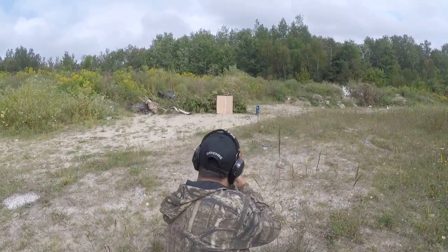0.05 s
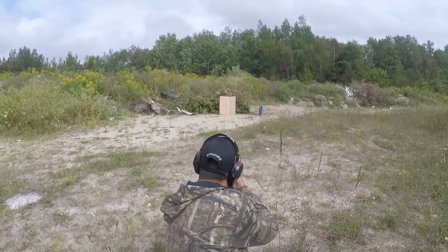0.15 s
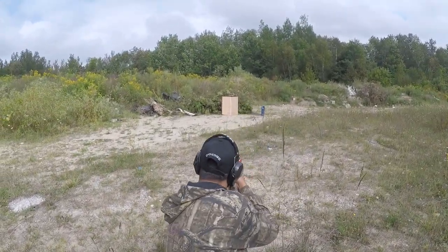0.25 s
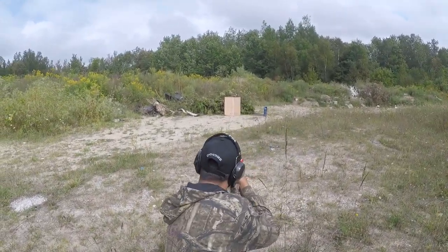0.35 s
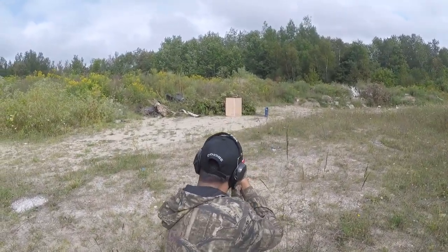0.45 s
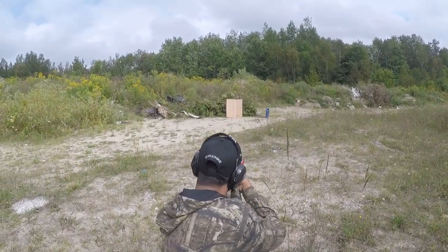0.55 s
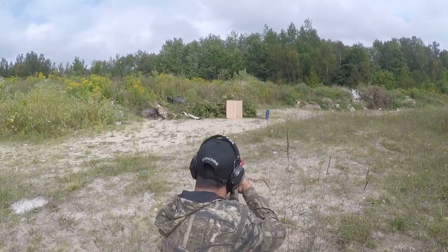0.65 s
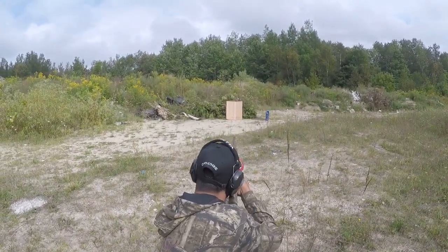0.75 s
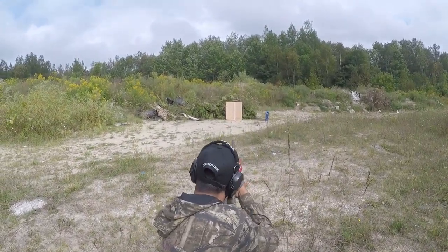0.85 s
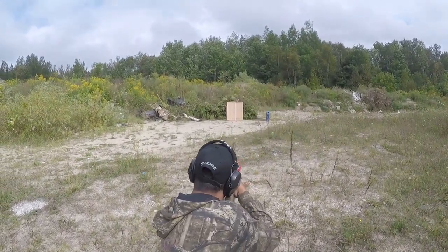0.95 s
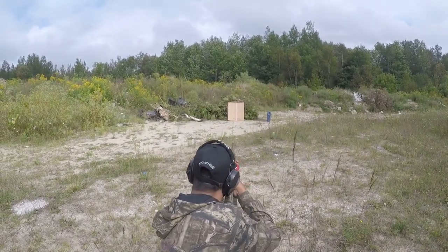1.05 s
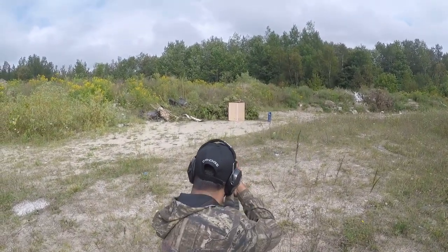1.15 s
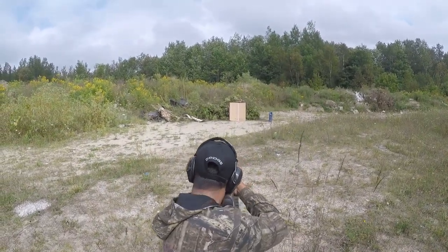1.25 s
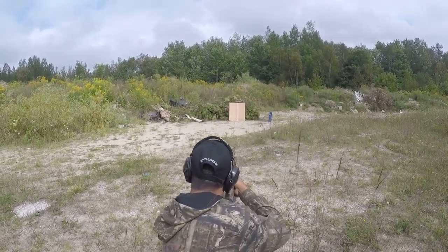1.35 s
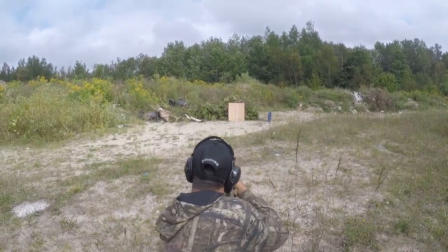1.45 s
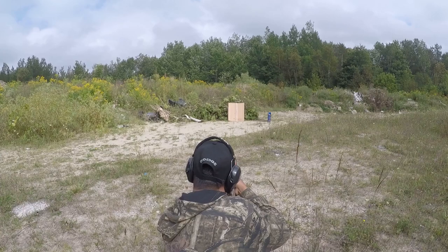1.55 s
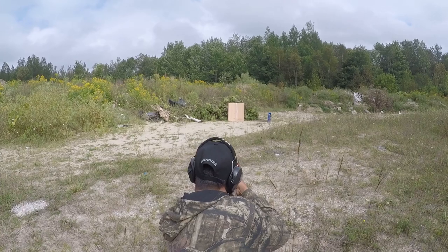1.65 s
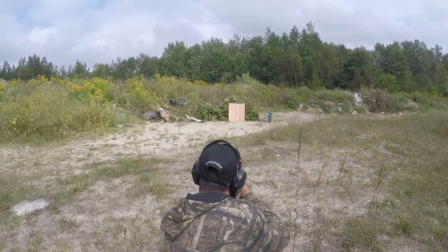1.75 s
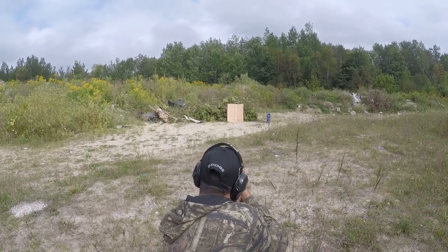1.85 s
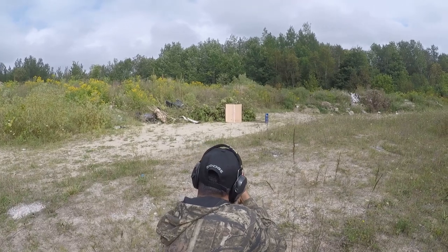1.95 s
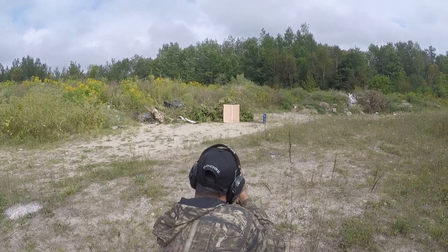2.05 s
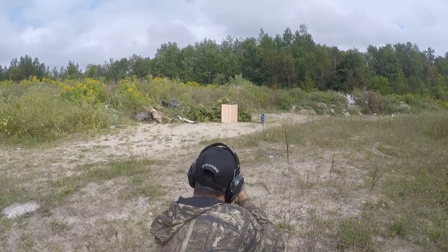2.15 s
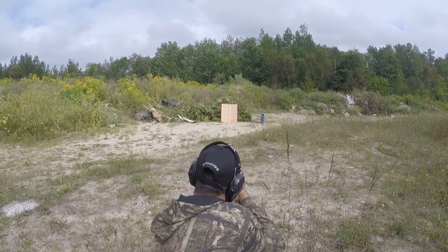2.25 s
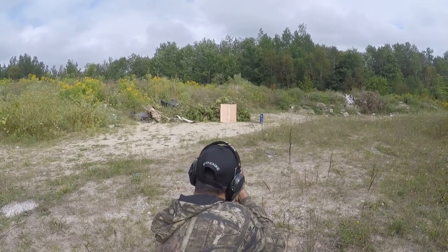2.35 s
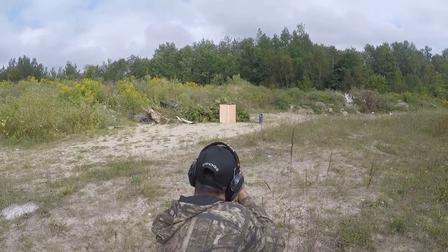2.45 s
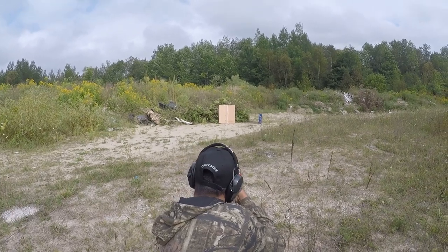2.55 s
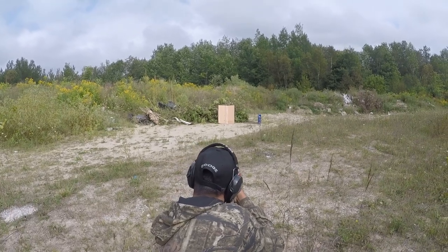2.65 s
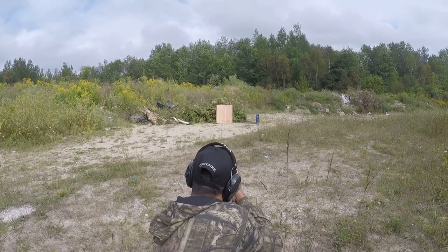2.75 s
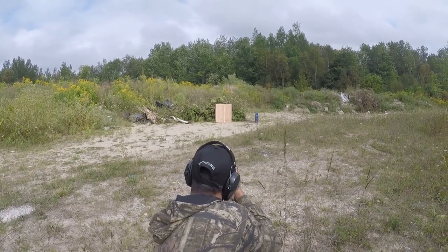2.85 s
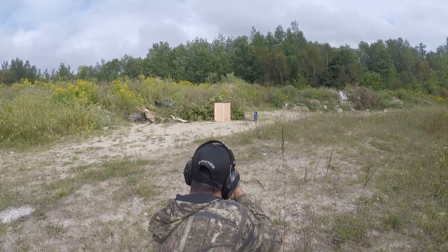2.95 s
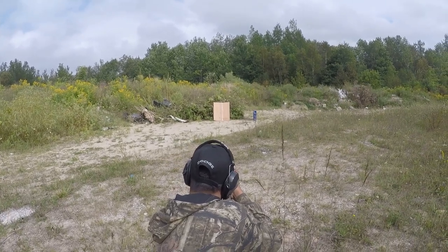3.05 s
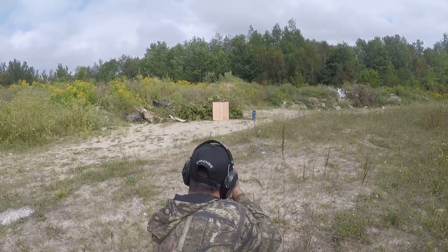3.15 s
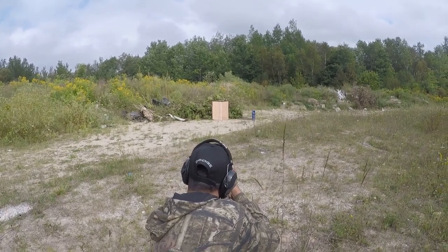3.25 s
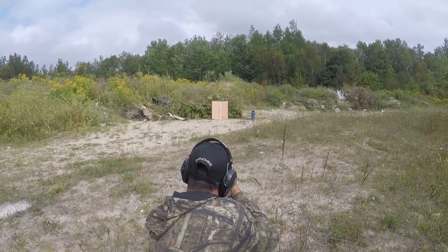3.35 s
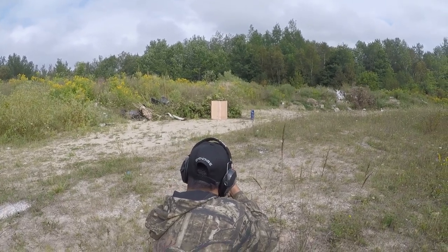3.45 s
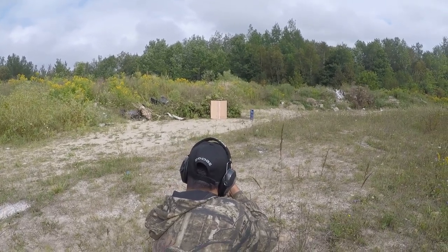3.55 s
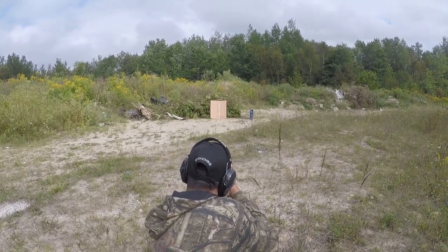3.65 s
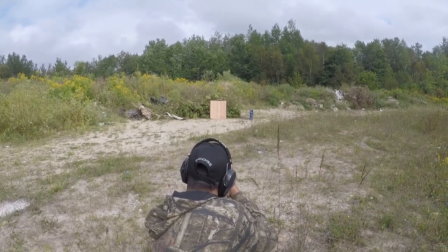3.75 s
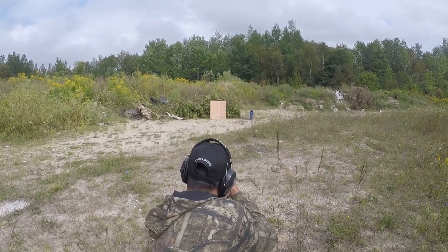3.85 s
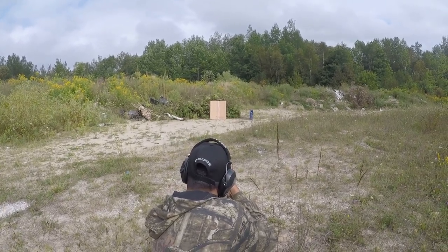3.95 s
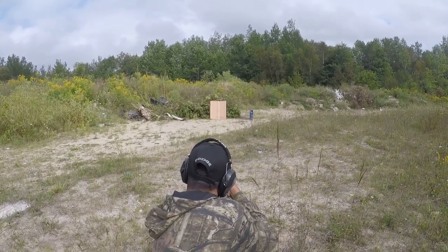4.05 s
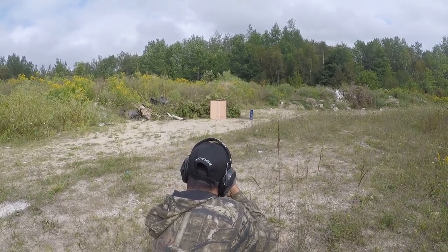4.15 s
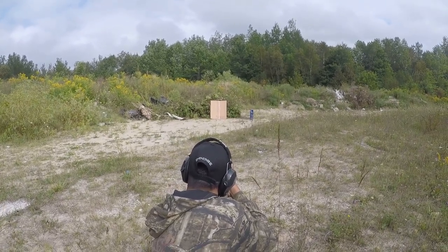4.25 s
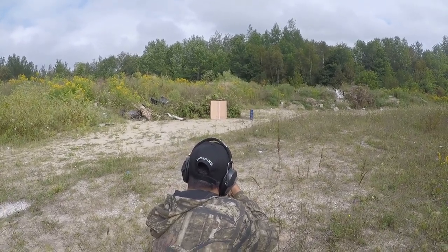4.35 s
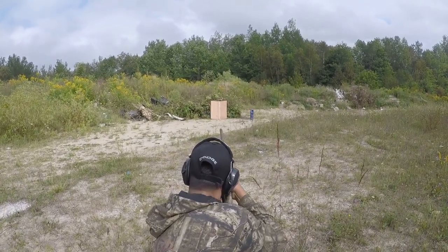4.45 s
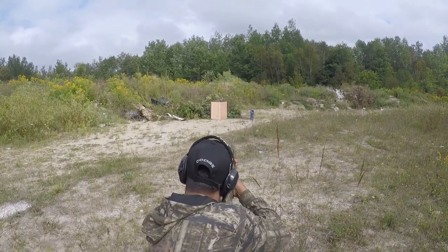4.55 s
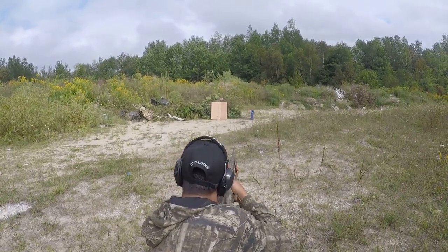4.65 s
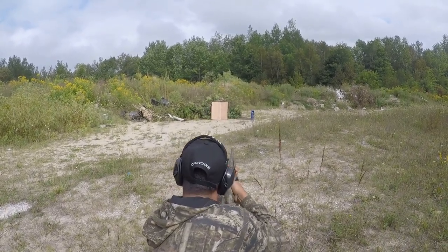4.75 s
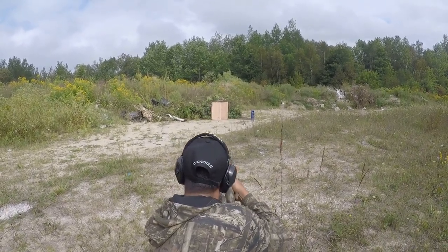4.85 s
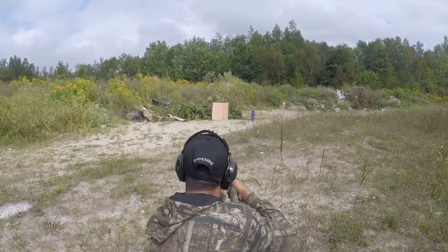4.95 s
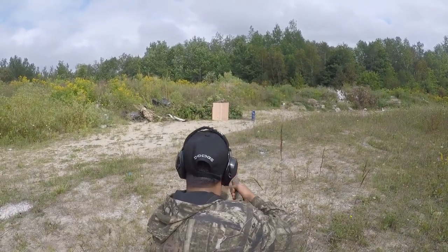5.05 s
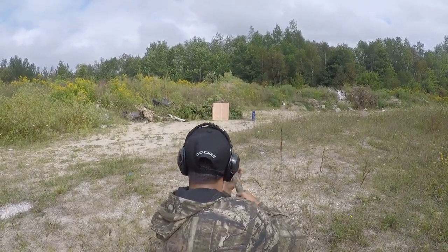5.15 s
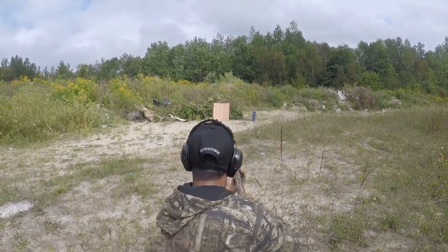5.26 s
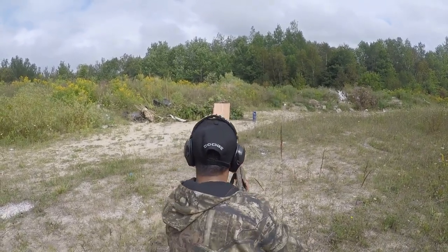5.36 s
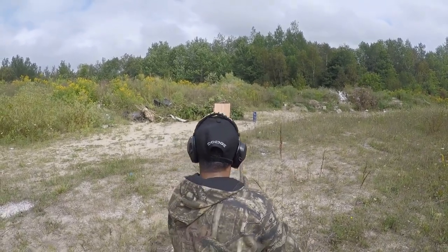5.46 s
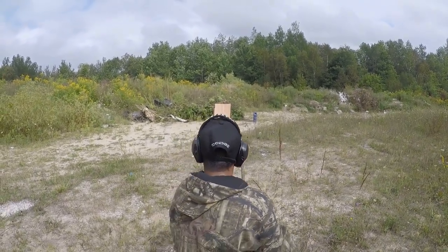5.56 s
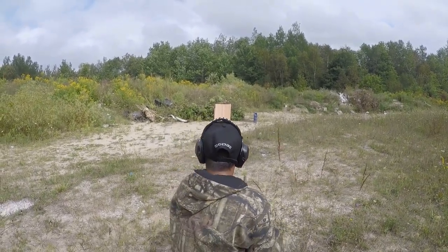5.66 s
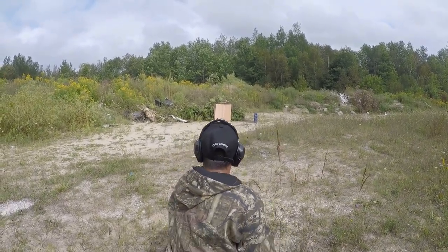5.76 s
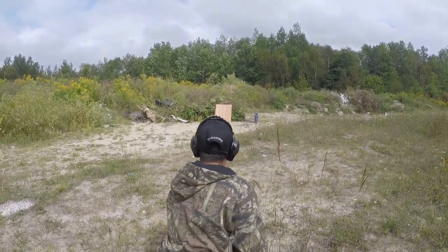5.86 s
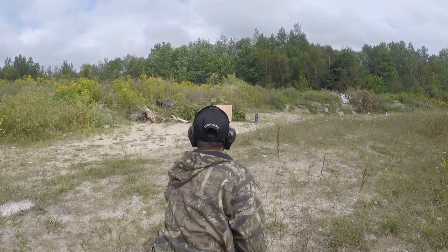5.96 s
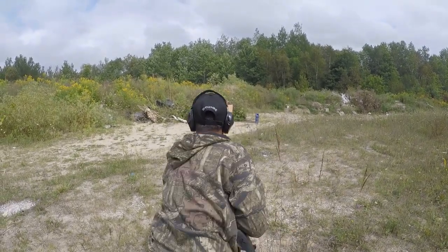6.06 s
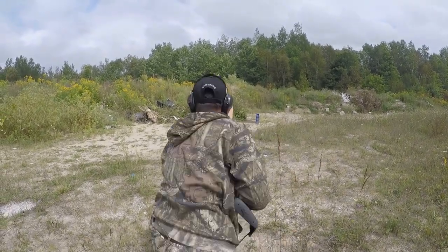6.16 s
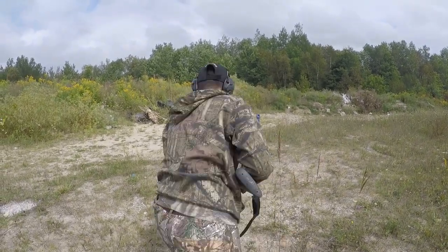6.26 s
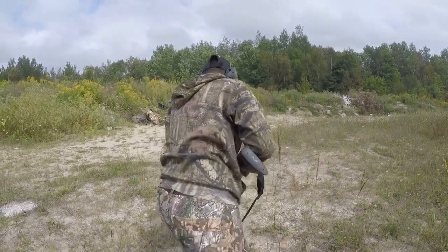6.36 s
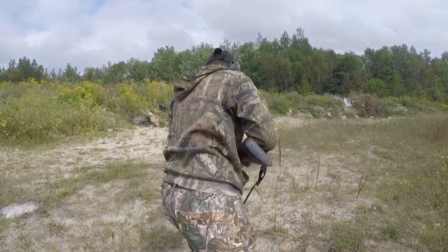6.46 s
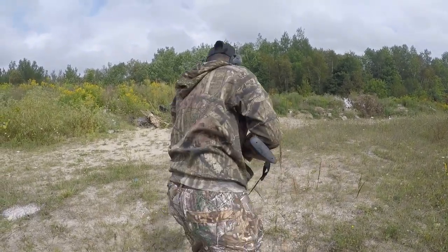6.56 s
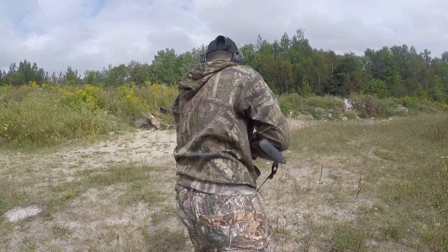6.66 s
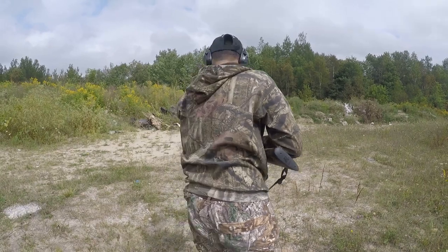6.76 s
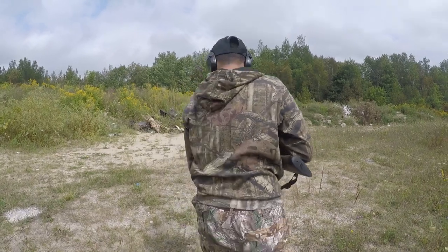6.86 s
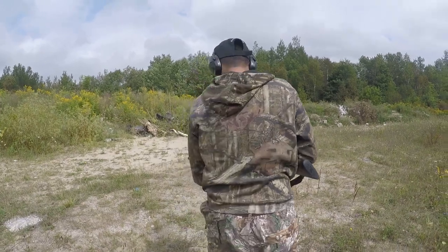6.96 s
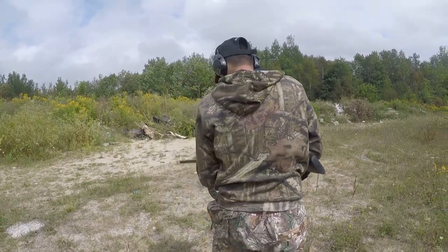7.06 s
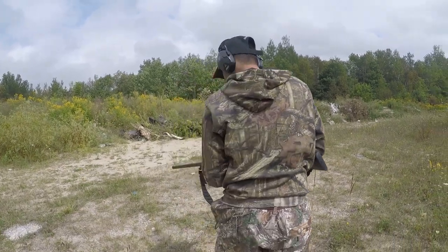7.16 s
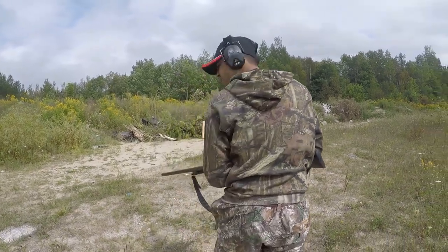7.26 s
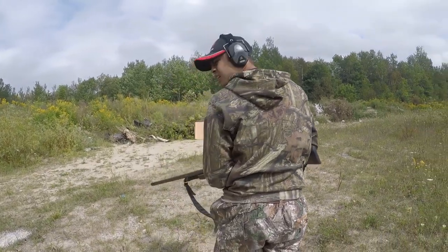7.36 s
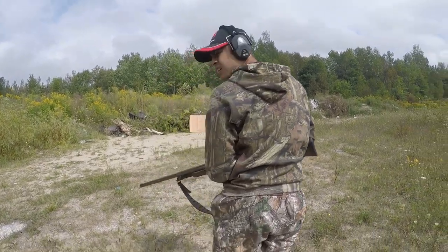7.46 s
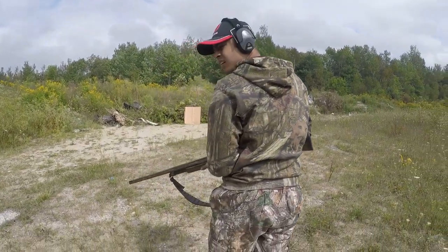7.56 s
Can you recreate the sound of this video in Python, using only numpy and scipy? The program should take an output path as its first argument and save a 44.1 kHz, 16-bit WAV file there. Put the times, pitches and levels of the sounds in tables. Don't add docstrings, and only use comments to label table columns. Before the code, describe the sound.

Outdoors, insects trill under small camera bumps until a single shotgun shot cracks, rolls back off the trees, and steel parts crunch shortly after.

```python
import sys
import numpy as np
from scipy import signal
from scipy.fft import rfft, irfft
from scipy.io import wavfile

SR = 44100
rng = np.random.default_rng(int(sys.argv[2]) if len(sys.argv) > 2 else 0)


def dump_mix(stems):
    frames = np.atleast_2d(stems).T
    limited = np.clip(frames, -1, 1)
    pcm = np.round(limited * 32767).astype(np.int16)
    wavfile.write(sys.argv[1], SR, pcm)


def undo_db(level):
    steps = np.asarray(level, float) / 20
    return 10 ** steps


N = 335160
T = np.arange(N) / SR
SHORT = 6000


def rms_one(x):
    return x / np.sqrt(np.mean(x ** 2) + 1e-20)


def in_time(rows):
    s, *columns = np.transpose(rows)
    return [np.interp(T, s, c, left=-120, right=-120) for c in columns]


def at_hz(points, hz):
    point_hz, value = np.transpose(points)
    return np.interp(np.log(hz), np.log(point_hz), value)


def drift(rate):
    r = np.exp(-80 * np.pi * rate / SR)
    chance = rng.standard_normal(N // 40 + 2002)
    slow = signal.lfilter([1], [1, -2 * r, r * r], chance)[2000:]
    return np.interp(np.arange(N) / 40, np.arange(len(slow)), rms_one(slow))


def band(x, low_hz, high_hz, order=2):
    return signal.sosfilt(signal.butter(order, [low_hz, high_hz], "band", fs=SR, output="sos"), x)


def ring(clicks, hz, t60):
    r = undo_db(-60 / (t60 * SR))
    w = 2 * np.pi * hz / SR
    return signal.lfilter([0, np.sin(w)], [1, -2 * r * np.cos(w), r * r], clicks + 1e-18)


def soft(clicks, contact_s):
    pulse = np.hanning(max(3, round(contact_s * SR)))
    return np.convolve(clicks, pulse / pulse.sum())[:len(clicks)]


def swell(rise_s, t60):
    t = T[:SHORT]
    rise = np.sin(np.pi / 2 * np.minimum(t / rise_s, 1)) ** 2
    return rise * undo_db(-60 * np.maximum(t - rise_s, 0) / t60)


def add(out, s, sound):
    i = round(s * SR)
    out[..., i:i + sound.shape[-1]] += sound[..., :N - i]


def sides(db):
    return undo_db(np.array([[db / 2], [-db / 2]]))


def coloured(spectrum, alike, patchy_db):
    hz = np.fft.rfftfreq(N, 1 / SR) + 1
    mid, side = rfft(rng.standard_normal((2, N))) * undo_db(at_hz(spectrum, hz))
    c = np.clip(at_hz(alike, hz), -1, 1)
    both = irfft(np.sqrt(1 + c) * mid + np.sqrt(1 - c) * side * [[1], [-1]], N)
    return rms_one(both * undo_db(patchy_db * drift(11.4)))


# t/s, push level/dB, ring f/Hz, crack level/dB,
# crack t60/s
BLAST = [(4.3909, -21, 875, -11.5, 0.0072), (4.396, -34, 900, -24, 0.0088), (4.4013, -22, 770, -40, .01),
         (4.4026, -18, 600, -26, 0.04), (4.4106, -14.5, 880, -30, .01), (4.4125, -5.5, 770, -10.5, 0.012),
         (4.4159, -4, 770, -22, 0.024), (4.4195, -31, 880, -16, 0.022), (4.4226, -3.5, 770, -10.5, 0.013),
         (4.4239, -8.5, 685, -18, 0.017), (4.4278, -9.5, 600, -28, .015), (4.4296, -6.5, 880, -1, 0.0099),
         (4.4326, -12, 880, -18, 0.012), (4.4336, -4.5, 860, 3.5, 0.0062), (4.4342, -15, 880, 1, 0.011),
         (4.4361, -4, 270, -21.5, 0.011), (4.491, -52, 890, -23.5, 0.042), (4.509, -50, 900, -26, 0.015),
         (4.518, -53, 900, -32.5, 0.038), (4.573, -36, 1050, -34, 0.18), (4.8252, -23, 1050, -25, 0.025)]
# t/s, level/dB
SWING = [(4.398, -34), (4.408, -16.5), (4.417, -7.5), (4.43, -10.5), (4.438, -15.5), (4.446, -37),
         (4.456, -46)]
# from t/s, to t/s, f/Hz, level/dB
WHISTLE = (4.403, 4.431, 7920, -35)
# f/Hz, level/dB
CRACK = [(250, -8), (710, -2.5), (1200, -5), (1750, -6.5), (2940, -7), (4830, -10.5), (5710, -6),
         (10600, -30), (12300, -32), (14900, -44.5)]


def blast():
    out, click = np.zeros((2, N)), np.eye(1, SHORT)[0]
    crack = coloured(CRACK, [(1000, .8), (9000, 0.55)], patchy_db=0)
    for s, push_db, hz, crack_db, t60 in BLAST:
        push_t60 = min(.0085, 7.7 / hz + .004)
        push = -undo_db(push_db + 0.5) * ring(soft(click, 0.00013), hz, push_t60)
        twist = 0.25 * np.roll(push, 25) * [[1], [-1]]
        burst = crack[:, round(s * SR):][:, :SHORT] * undo_db(crack_db - 8.0) * swell(0.00063, t60)
        add(out, s, push + twist + burst)
    phase = 2 * np.pi * 143 * (T - 4.406)
    swing = undo_db(in_time(SWING)[0]) * np.sin([phase + 0.23, phase - .6])
    start, end, hz, db = WHISTLE
    arch = np.sqrt(np.maximum(0, 4 * (T - start) * (end - T))) / (end - start)
    whistle = undo_db(db) * arch * np.sin(2 * np.pi * hz * T)
    return out + swing * sides(3.1) + whistle * [[.4], [1.6]]


# t/s, level/dB, rise/s, fall/(dB/s), treble level/dB
ECHO = [
    (4.44, -47.5, .004, 380, -11),
    (4.47, -68, 0.033, 0, 7.5),
    (4.6, -64.5, 0.033, 145, 5.5),
    (4.75, -45.5, 0.023, 85.5, 1),
    (4.868, -44, 0.074, 82, -3.5),
    (4.97, -54, 0.2, 21, -3),
    (5.3, -59.5, 0.61, 2, -28),
]


def returns(faster, air_db_per_s, bright):
    power = 0
    for s, db, rise_s, fall, treble_db in ECHO:
        climb_db = 18.5 * np.minimum(T - s, 0) / rise_s
        fall_db = (faster * fall + air_db_per_s) * np.maximum(T - s, 0)
        power = power + undo_db(db + bright * treble_db - fall_db + climb_db) ** 2
    return np.sqrt(power) * (T > ECHO[0][0])


# f/Hz, level/dB
ECHO_BODY = [(130, -12), (200, -2), (404, -3), (496, -3.5), (686, -3.5), (834, 2), (1430, -6),
             (2600, -21.5), (3380, -29.5), (5720, -120)]
# f/Hz, level/dB
ECHO_TOP = [(1060, -17), (1800, -2), (2350, -9), (2660, -6), (4900, -12), (6070, -7), (9810, -31),
            (11300, -43), (13000, -49)]
# f/Hz, likeness/(-1 to 1)
ECHO_ALIKE = [(60, 0.35), (180, 1), (540, 0.75), (1610, 0.18), (4830, 0.87), (14500, -1.4)]


def echo():
    body = undo_db(6.0) * returns(1, 0, 0) * coloured(ECHO_BODY, ECHO_ALIKE, patchy_db=.4)
    treble = coloured(ECHO_TOP, ECHO_ALIKE, patchy_db=.4)
    dull = signal.sosfilt(signal.butter(2, 6800, fs=SR, output="sos"), treble)
    dark = signal.sosfilt(signal.butter(2, 2800, fs=SR, output="sos"), treble)
    top = (treble - dull) * undo_db(-45 * np.maximum(T - 4.8, 0) + 6)
    middle = (dull - dark) * undo_db(-22.0 * np.maximum(T - 5.1, 0))
    treble_level = undo_db(7.0) * returns(faster=1, air_db_per_s=3.5, bright=0.7)
    return body + treble_level * (dark + middle + top)


# t/s, peak level/dB, tilt/(dB per octave)
CLICKS = [
    (6.914, -36, 1),
    (6.934, -29, 1),
    (6.94, -39, 3),
    (6.947, -22, 3.5),
    (6.957, -24, 5),
    (6.9619, -22.5, -14),
    (6.9662, -10.5, -8),
    (6.967, -46, 6),
    (6.973, -50, -2),
]
# f/Hz, level/dB, t60/s
ACTION = [(1250, -6.5, 0.013), (1840, -2.5, 0.0052), (2540, -20, 0.005), (3200, 7.5, 0.0051),
          (3940, -5.5, 0.011), (4700, 1, 0.011), (5350, -5, 0.008), (6130, 0, 0.003), (7600, -16, 0.028),
          (9400, -9.5, 0.0072), (12400, -14, 0.0061)]
# t/s, level/dB
SLIDE = [(6.9125, -45), (6.915, -39), (6.93, -33.5), (6.945, -32), (6.955, -37), (6.966, -30), (6.985, -59),
         (7.0, -56)]
# f/Hz, level/dB
CRUNCH = [(290, -47), (500, -4), (1230, 0), (2200, -11), (4630, -5), (5110, -20.5), (6500, -8.5),
          (8250, -30.5), (9640, -26), (14500, -44)]


def action():
    s, db, tilt_db = np.transpose(CLICKS)
    slide = undo_db(in_time(SLIDE)[0])
    grain = undo_db(-18.5 + 7.6 * np.minimum(rng.exponential(1, N), 2.5))
    scrape = slide * grain * (rng.random(N) < 3000 / SR)
    out = np.zeros(N)
    for hz, mode_db, t60 in ACTION:
        clicks = scrape * rng.choice([-1, 1], N) * min(1, hz / 3000)
        struck = s + rng.uniform(0, .0018, len(s)) * (hz > 1500)
        blow_db = db - 4 + tilt_db * np.log2(hz / 3000) + rng.normal(0, 3.0, len(s))
        clicks[(struck * SR).astype(int)] -= undo_db(blow_db)
        out += ring(undo_db(mode_db) * clicks, hz, t60)
    envelope = np.array([.5 * slide, .5 * slide])
    for at, level_db, tilt in zip(s, db, tilt_db):
        low_cut_db = np.array([[1.2 + 2.4 * max(tilt, 0)], [0]])
        add(envelope, at, undo_db(level_db + 2 - low_cut_db) * swell(0.00049, 0.031))
    grit = coloured(CRUNCH, [(1000, 0.67), (9000, .7)], patchy_db=0)
    crunch = envelope[0] * band(grit, 200, 1430) + envelope[1] * band(grit, 2080, 14000)
    return (soft(out, 0.00013) + crunch) * sides(-2.5)


# (f/Hz, level/dB, t60/s)
CATCH = [
    (0.9257, -22.5, -4, [(1080, -7, 0.021), (1790, -7, 0.019), (2180, -5, .013), (3020, 0.5, .019), (3380, -1.5, .015), (4320, -3.5, 0.032), (5480, -4.5, 0.013), (6800, -10, .02)]),
    (0.987, -35.5, -4, [(1890, -1.5, 0.036), (4436, -1, .06)]),
    (1.0011, -31, -2, [(900, -5, 0.011), (1840, -12, 0.026), (2900, -8, 0.011), (4700, -8, .015), (6000, 3, 0.012), (7320, -6, .015)]),
]


def catch():
    out, click = np.zeros((2, N)), np.eye(1, SHORT, 40)[0]
    touch = 0.18 * click + np.roll(click, 55) + 0.46 * np.roll(click, 150)
    for s, db, rattle_db, modes in CATCH:
        rings = np.zeros(SHORT)
        for k, (hz, mode_db, t60) in enumerate(modes):
            rings += (-1) ** k * undo_db(mode_db) * ring(touch, hz, t60)
        noise = rng.standard_normal((2, SHORT))
        rattle = undo_db(rattle_db) * band(noise[0] + 0.87 * noise, 880, 5000) * swell(0.0026, 0.044)
        add(out, s - .002, undo_db(db) * (0.91 * rings + rattle) * sides(-4.5))
    return out


# t/s, peak level/dB, ring f/Hz, snap level/dB, L-R level/dB
TAPS = [(0.133, -31.5, 877, -2.5, -3), (0.521, -35, 860, -7, -2), (0.908, -39, 804, -8, -1),
        (1.34, -40, 870, -1, 0), (1.4395, -28, 874, -9.5, -2)]
GRIPS = [(0.712, -36.5, 334, -2, 2.5), (0.729, -35, 170, -22, 1), (1.243, -35.5, 159, -31, 6),
         (1.697, -31, 184, -34, 5), (1.903, -35, 292, -1, 1.5), (2.051, -38, 138, -9, -12),
         (2.196, -23, 188, -16, 0), (2.584, -28.5, 307, -3, 3.5), (2.593, -28, 275, 1, -4.5),
         (2.734, -34, 324, -4, 4), (2.92, -30, 313, 2, 3), (2.963, -35, 262, -13, -5),
         (3.001, -31, 300, 0, -1), (3.015, -25.5, 290, -10, -1.5), (3.131, -21.5, 197, -8, -3),
         (3.144, -32, 227, -5, -7), (3.157, -23.5, 282, -13, 0.5), (3.183, -20, 310, 1.5, 2),
         (3.322, -27.5, 250, -9, 2), (3.373, -35, 310, -1, -1), (3.381, -24.5, 312, -1, 1.5),
         (3.511, -39, 340, 0, 3), (3.993, -29, 300, -1, 1), (4.3, -31.5, 309, 1.5, 1)]
JOLTS = [(4.49, -13, 201, -36, 2), (4.509, -33.5, 517, -30, 0), (4.518, -25, 227, -28, 0),
         (4.532, -21.5, 180, -28, 4), (4.573, -16.5, 183, -32, 1), (4.584, -21, 235, -28, 3),
         (4.593, -23, 230, -40, 0), (4.606, -23.5, 283, -39, -2), (4.624, -20.5, 191, -36, -1),
         (4.555, -27, 160, -38, -4), (4.645, -30, 170, -40, 0), (4.662, -47, 233, -40, 0),
         (4.683, -41, 198, -38, -6), (4.706, -39, 181, -40, 3), (5.765, -26, 146, -31, 1)]
SHIFTS = [(6.318, -38, 278, -14, -4), (6.353, -31.5, 168, -14, -6), (6.494, -23, 281, -10.5, -2),
          (6.609, -20, 258, -17, -9.5), (6.666, -23, 171, -13.5, -9), (6.753, -17, 267, -12.5, -9),
          (6.788, -19, 326, -20, -4), (6.86, -20, 265, -5, 2.5), (7.001, -23, 218, -36, 1),
          (7.051, -20, 293, -11.5, -0.5), (7.12, -28.5, 292, -12.5, -6), (7.309, -35.5, 214, 1.5, -10),
          (7.322, -39, 330, 4, -1), (7.335, -39, 278, -2, -8), (7.349, -40, 330, 4, -6),
          (7.383, -29, 197, -15, -4), (7.46, -24, 228, -25, 7), (7.359, -25, 370, 3.5, 1),
          (7.44, -23.5, 247, -21, -4), (7.467, -22, 318, -11.5, 0), (7.53, -31.5, 323, -10, -2)]
# rows, t60/s, twist level/dB, thud f/Hz, thud level/dB
HANDLING = [(TAPS, 0.059, -9, 593, 5.7), (GRIPS, 0.04, 10.4, 387, -8),
            (JOLTS, 0.032, -22, 470, -11.5), (SHIFTS, 0.036, 0.1, 430, -7)]


def knocks():
    out, click = np.zeros((2, N)), np.eye(1, SHORT, 60)[0]
    for rows, t60, twist_db, thud_hz, thud_db in HANDLING:
        thud = undo_db(thud_db) * ring(soft(click, 0.00079), thud_hz, 0.021)
        for s, db, hz, snap_db, pan_db in rows:
            touch = soft(click, 0.38 / hz)
            body = 1.184 * ring(touch, hz, t60) + thud
            twist = undo_db(twist_db) * ring(touch, 1.235 * hz, t60) * [[1], [-1]]
            noise = rng.standard_normal((2, SHORT))
            grit = noise[0] + undo_db(twist_db) * noise[1] * [[1], [-1]]
            snap = band(click + .12 * grit * swell(0.0019, 0.027), 307, 1430, order=5)
            snap = undo_db(snap_db + 3.0) * snap / np.abs(snap).max()
            add(out, s, -undo_db(db) * (body + twist + snap) * sides(pan_db - 1.0))
    return signal.sosfilt(signal.butter(8, 135, "high", fs=SR, output="sos"), out)


# start t/s, length/s, level/dB, brightness level/dB
CLOTH = [(0.134, 0.19, -53.5, -0.5), (0.537, 0.17, -49, -13), (0.601, 0.016, -44.5, -30),
         (0.621, 0.021, -45, -25), (0.64, 0.022, -42.5, -27), (6.42, 0.3, -76, -18),
         (6.749, 0.035, -39, -14), (6.947, 0.15, -67, 14), (7.077, 0.11, -61.5, 5),
         (7.285, 0.12, -48, -8.5)]


def rubs():
    dull, bright = np.zeros((2, N))
    for s, length_s, db, bright_db in CLOTH:
        stroke = undo_db(db) * np.sin(np.pi * np.clip((T - s) / length_s, 0, 1)) ** 0.72
        dull, bright = dull + stroke, bright + undo_db(bright_db) * stroke
    return dull, bright


def cloth():
    dull_gain, bright_gain = rubs()
    grains = rng.standard_normal(N) * [[1], [-1]] + 8.8 * rng.standard_normal((2, N))
    grains = grains * undo_db(3.2 * drift(144))
    dull, bright = band(grains, 223, 1620, order=4), band(grains, 4860, 7200)
    return undo_db(5.5) * (dull_gain * rms_one(dull) + bright_gain * rms_one(bright))


# t/s, peak level/dB
PUFFS = [(5.513, -50), (5.739, -30.5), (6.149, -35), (6.3, -26), (6.597, -27), (6.764, -36), (7.285, -44)]


def puffs():
    out, click = np.zeros((2, N)), np.eye(1, SHORT)[0]
    for s, db in PUFFS:
        spread = np.exp(rng.normal(0, 0.16, 2))
        thump = [ring(soft(click, 0.0042), 72.6 * k, 0.14) for k in spread]
        add(out, s, undo_db(db - 0.5) * np.array(thump))
    return out


# t/s, drop level/dB, recovery/(dB/s)
DUCKS = [
    (4.42, -35.5, 15.5),
    (6.965, -4, 8),
]


def ducking():
    return undo_db(sum(np.minimum(0, drop_db + rate * (T - s)) * (T > s) for s, drop_db, rate in DUCKS))


# t/s, level/dB
WIND = [(0.0, -46), (0.19, -45.5), (0.67, -50), (2.31, -64), (2.54, -68.5), (3.17, -66), (3.49, -76),
        (4.25, -78), (4.55, -62), (4.95, -73), (5.48, -56), (5.97, -54), (6.75, -41), (7.6, -57.5)]


def wind():
    wind_db, = in_time(WIND)
    gusts = band(rng.standard_normal((2, N)), 13.3, 81) * undo_db([1.33 * drift(1.2), 5.35 * drift(29)])
    shared, own = rng.standard_normal(N), rng.standard_normal((2, N))
    rumble = band(0.93 * shared * [[1], [-1]] + own, 131.4, 307.7, order=6) * undo_db(4.8 * drift(20.0))
    busy = sum(undo_db(row[1] - 19) ** 2 * np.exp(-np.abs(T - row[0]) / 0.048) for row in GRIPS + SHIFTS)
    recoil_s = 4.45
    recoil = undo_db(-40) ** 2 * np.exp(-np.maximum(T - recoil_s, 0) / .24) * (T > recoil_s)
    steady = undo_db(-49.5) ** 2 * ducking() ** 1.6
    power = steady + undo_db(wind_db - 1.5) ** 2 + busy + recoil
    return undo_db(wind_db + 8.0) * rms_one(gusts) + np.sqrt(power) * rms_one(rumble) * sides(-1.5)


# t/s, lead on the mean beat/turns
BEAT = [(0, .27), (2.2, .365), (4.2, .345), (5.4, .05), (7.6, .17)]


def cricket(top_hz=3960, fall_hz=420, duty=0.71, level_db=-43):
    beat = 35.4 * T + in_time(BEAT)[0] + .4
    turn = np.minimum(beat % 1 / duty, 1)
    hz = top_hz - fall_hz * turn ** 0.54 + 7.3 * drift(9)
    stroke = np.sin(np.pi * turn) ** 1.65 * undo_db(level_db + 0.2 * drift(22.5) + 0.21 * drift(150))
    song = stroke * np.sin(2 * np.pi * np.cumsum(hz) / SR)
    return np.array([np.roll(song, 12), song]) * sides(-6)


# low f/Hz, high f/Hz, level/dB, throb level/dB, throb f/Hz
CHORUS = [
    (3297, 3440, -57.5, 2.5, 48),
    (3920, 4150, -63.5, -2, 48),
    (5680, 6540, -62.5, 0, 7.3),
    (7220, 8150, -68.5, 6.5, 16),
]


def chorus():
    white = rng.standard_normal(N) + 0.68 * rng.standard_normal((2, N))
    out = np.zeros((2, N))
    for low_hz, high_hz, db, throb_db, rate in CHORUS:
        throb = undo_db(db + throb_db * np.cos(2 * np.pi * rate * T))
        out += throb * rms_one(band(white, low_hz, high_hz))
    return out


# f/Hz, level/dB
FIELD = [(180, -63), (300, -39), (331, -27), (365, -1), (540, -3.5), (626, -2.5), (774, -6), (973, -7),
         (1700, -11.5), (1810, -13.5), (3110, -15), (3720, -5.5), (4380, -18.5), (8010, -12.5),
         (14900, -45.5)]
# f/Hz, likeness/(-1 to 1)
FIELD_ALIKE = [(200, 0.12), (600, 0.71), (1400, 0.51), (3000, 0.3), (4200, 0.58), (6500, 1), (10000, 0.38),
               (14000, 0.045)]
# f/Hz, L-R level/dB
FIELD_LEAN = [(60, -5.5), (110, -6), (200, -5), (370, -1), (690, -1), (1260, -1), (2320, -1.5), (4270, 0),
              (7860, -6.5), (14500, 1.5)]
# f/Hz, left lead/rad
PORTS = [(0, 0), (500, -3.2), (1300, -3.3), (3600, -6.4), (4400, -6.3), (5300, -7.7), (8100, -9.4),
         (15000, -9.6)]


def field():
    hz = np.fft.rfftfreq(N, 1 / SR) + 1
    lean = undo_db(at_hz(FIELD_LEAN, hz) * [[.5], [-.5]])
    turned = np.exp(1j * np.interp(hz, *np.transpose(PORTS)) * [[1], [0]])
    noise = coloured(FIELD, FIELD_ALIKE, patchy_db=0.9)
    return undo_db(-47) * irfft(rfft(noise) * lean * turned, N)


def scene():
    near = blast() + echo() + action() + catch() + knocks() + cloth() + puffs() + wind()
    background = cricket() + chorus() + field()
    hiss = undo_db(-77.5) * rng.standard_normal((2, N))
    return near + ducking() * background + hiss


def top_cut(x):
    return signal.sosfilt(signal.butter(12, 15060, fs=SR, output="sos"), x)


def record(dry):
    rounded = 1.2 * np.tanh(dry / 1.2)
    mix = signal.sosfilt(signal.cheby2(14, 60, 15700, fs=SR, output="sos"), rounded)
    return top_cut(mix)


dry = scene()
out = record(dry)
dump_mix(out)
```